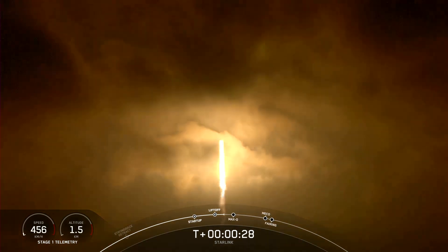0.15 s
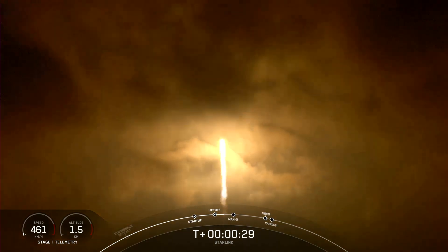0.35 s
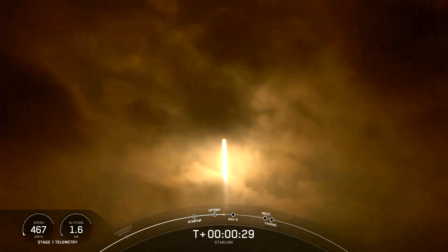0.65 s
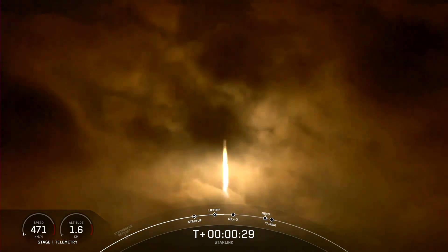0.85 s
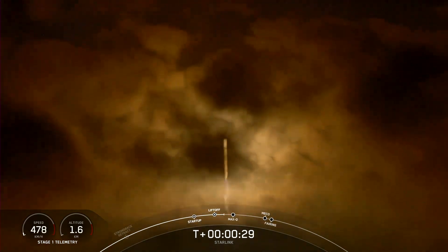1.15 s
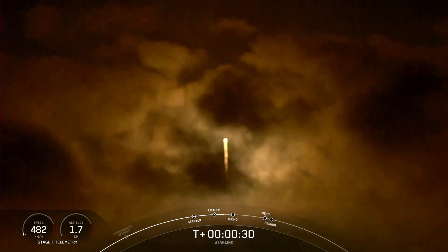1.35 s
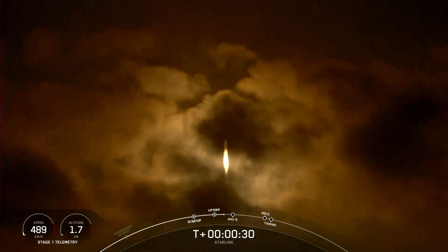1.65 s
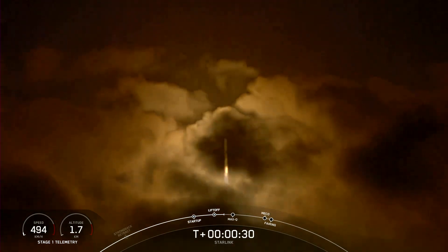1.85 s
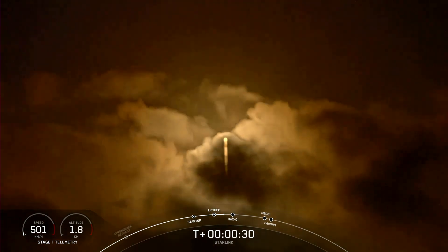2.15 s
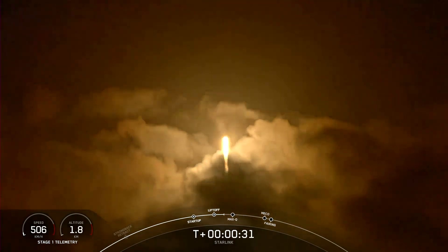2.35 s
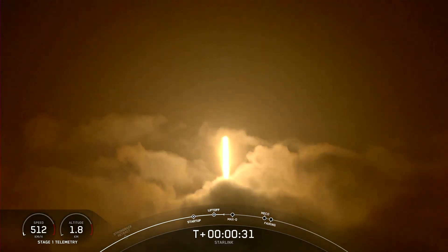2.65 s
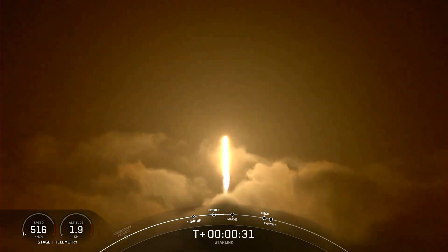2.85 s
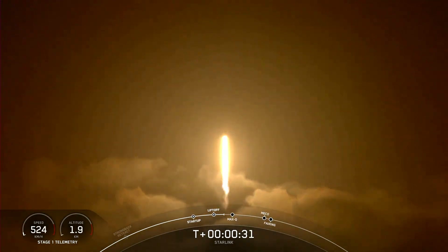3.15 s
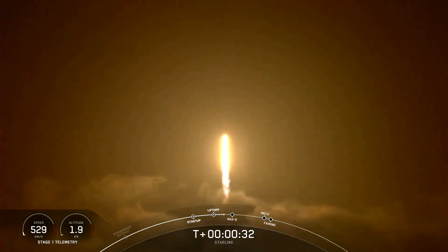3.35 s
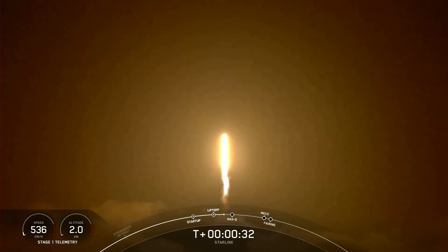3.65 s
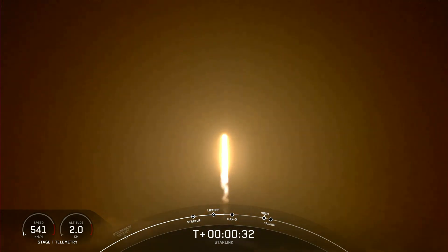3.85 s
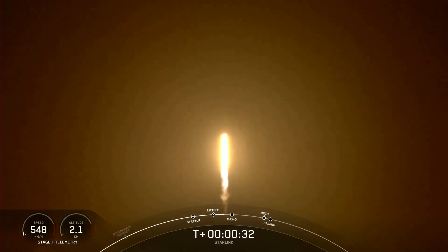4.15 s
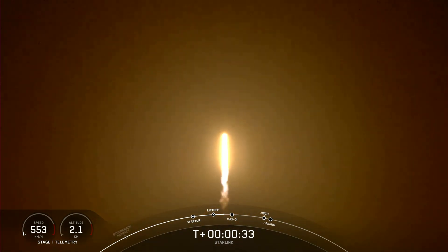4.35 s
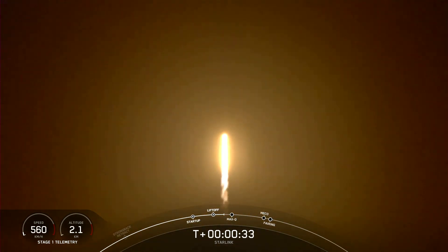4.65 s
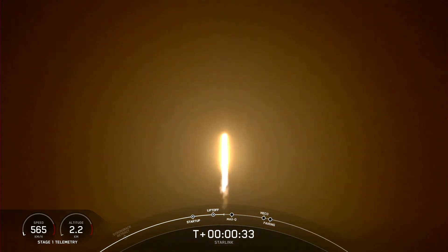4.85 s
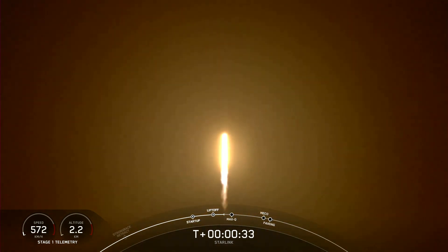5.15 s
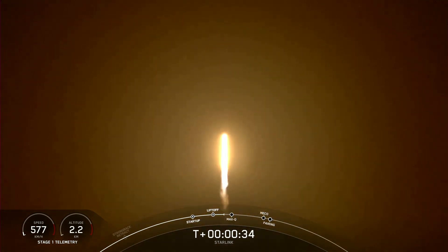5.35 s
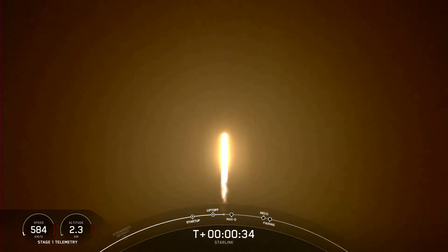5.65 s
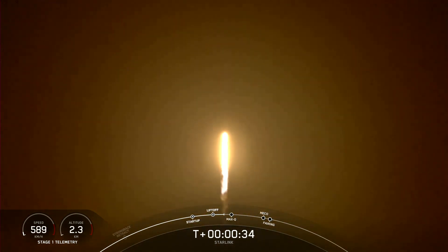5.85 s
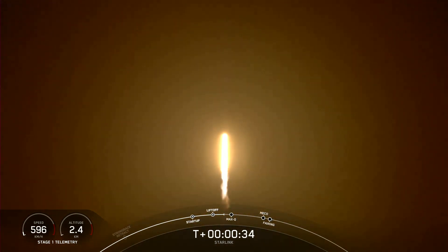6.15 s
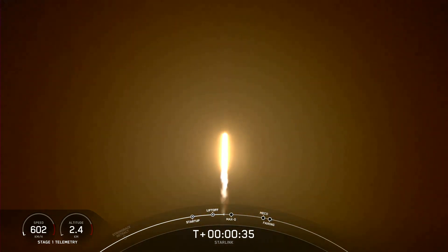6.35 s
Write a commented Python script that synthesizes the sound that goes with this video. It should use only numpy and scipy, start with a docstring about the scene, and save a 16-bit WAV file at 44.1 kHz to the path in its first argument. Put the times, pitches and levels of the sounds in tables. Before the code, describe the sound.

A large rocket ascends through the night sky, heard outdoors from several kilometres away. From 0 to 1.4 seconds the engines are a low, subdued, throbbing rumble, with soft smooth hiss clearly present and a tiny raspy chirp near 0.2. Around 1.5 the bass lifts with a low thump; stronger thumps follow near 2.2 and 2.9, with another small chirp at about 2.2. From 3 seconds the rumble is heavier and a muffled, hollow roar comes forward, with uneven surges around 3.3, 3.6, 4.1 and 4.5. After 5 seconds the roar swells more and faint, distance-dulled crackle emerges; very faint high chirps near 5.5 are almost buried. It is loudest at 6 to 6.5, bass-heavy, the biggest throbs held down, ending mid-roar. A very thin, steady high whine stays far beneath throughout.

```python
"""A large rocket climbs through the night sky a few kilometres from an outdoor microphone.
Its plume is shaped noise: big eddies throb and rumble, small ones roar, and weak shocks, random pulses
dulled by the long air path, crackle. It swells unevenly, with low thumps at the strongest surges.
A delayed, duller ground echo hollows the roar into broad humps. Under it lie a soft hiss of shaped noise
that swells a little, a thin sine whine and a few faint chirps, raspy gliding notes."""
import sys
import numpy as np
from scipy import signal
from scipy.fft import rfft, irfft, next_fast_len
from scipy.io import wavfile
from scipy.ndimage import uniform_filter1d, minimum_filter1d

SR = 44100
rng = np.random.default_rng(int(sys.argv[2]) if len(sys.argv) > 2 else 0)


def to_wav(s):
    """Save 16-bit WAV."""
    ch = np.atleast_2d(s).T  # columns
    pcm = np.round(np.clip(ch, -1, 1) * 32767)  # PCM
    wavfile.write(sys.argv[1], SR, pcm.astype(np.int16))


N = 286209
TIME = np.arange(N) / SR

# relative spectra of the plume layers, before the ground echo: (frequency [Hz], density [dB per Hz])
THROB_SPECTRUM = [(6, -20.5), (20, -6), (33, 1), (46, -1), (64, -8.5)]
RUMBLE_SPECTRUM = [(30, -33), (50, -7.5), (63, -1.5), (78, -2.5), (100, -5.5), (128, -8.5), (160, -12.5),
                   (195, -22.5)]
ROAR_SPECTRUM = [(150, -22.5), (190, -4), (245, -0.5), (310, -5), (400, -9.5), (500, -12), (700, -19),
                 (850, -21.5), (1100, -31), (1500, -38.5), (2500, -46.5)]
# the filter that gives the shock pulses their crackle: (frequency [Hz], gain [dB])
CRACKLE_SPECTRUM = [(300, -17), (700, -3), (1080, 8.5), (1300, 8.5), (1550, -4), (2100, -0.5), (2600, 5.5),
                    (2800, 1), (3100, -14.5), (3600, -29)]
# the plume swells unevenly as the rocket climbs, before each layer's trim:
# (time [s], bass level [dB], roar level [dB])
PLUME_SWELL = [(0, -32.5, -48.0), (0.8, -32.5, -46), (1.5, -29, -45.5), (2.4, -29, -44.5),
               (3.15, -25.5, -41), (4.5, -24, -40.5), (5.25, -22, -37.0), (6.49, -18.5, -35.0)]
# the strongest surges of the plume, each a low thump: (time [s], throb lift [dB], rumble lift [dB])
PLUME_SURGES = [(1.5, 4.5, 4), (2.23, 8, 0), (2.8, 5, 0.5), (2.88, 8, -0.5), (3.27, 5, 2.5),
                (3.57, 8.5, 1.5), (4.08, 3.5, -1.5), (4.51, 8, 3.5), (4.77, 4, 3.5), (5.12, 2, 4.5),
                (5.28, 1, 4.5), (5.42, 6, -1), (5.91, 2, 0), (6.25, 5.5, 0)]
# the ground echo as the rocket climbs: (time [s], lag [ms], strength [0-1])
GROUND_ECHO = [(0, 2.83, 0.4), (6.49, 2.897, 0.65)]
# relative spectrum of the soft hiss: (frequency [Hz], density [dB per Hz])
HISS_SPECTRUM = [(100, 4), (900, 0), (1500, -1.5), (1750, 0), (2150, -4), (2600, -4), (3200, -7),
                 (4000, -11), (5000, -15), (7500, -20), (8500, -23.5), (12700, -31.5)]
# how loud the hiss is: (time [s], level [dB])
HISS_LEVEL = [(0, -62), (2.2, -62.3), (3.3, -61), (4.8, -61.5)]
# faint chirps of small night animals:
# (start [s], length [s], start pitch [Hz], end pitch [Hz], rasp rate [levels per s], level [dB])
NIGHT_CHIRPS = [(.165, .045, 2420, 2350, 550, -65.5), (2.225, .055, 2620, 2620, 600, -63),
                (2.22, .2, 3950, 4400, 400, -79), (3.11, .06, 4750, 4800, 250, -79),
                (5.45, .11, 4700, 4750, 180, -76), (5.62, .1, 4100, 4050, 180, -78)]

SURGE_WIDTH_S = 0.025  # standard deviation of the bell curve
# the bass also heaves at random: new levels per second, and their spread
HEAVE_PER_S, THROB_HEAVE_DB, RUMBLE_HEAVE_DB = 18, 1.68, 0.85
GROUND_DULL_HZ = 870
WHINE_HZ, WHINE_DB = 8000, -92
TOP_HZ = 12750


def undb(db):
    """Decibels to gain."""
    return 10 ** (np.asarray(db) / 20)


def curve(rows, axis=1):
    """One column of (time, value, ..) rows, joined by straight lines."""
    rows = np.array(rows)
    return np.interp(TIME, rows[:, 0], rows[:, axis])


def unit(x):
    """Scale to rms 1."""
    return x / np.std(x)


def colour(x, points):
    """Shape a sound by (Hz, dB) points on a log-frequency axis, falling steeply above the last; rms 1."""
    hz, db = np.transpose(points)
    size = next_fast_len(N)
    bins = np.maximum(np.fft.rfftfreq(size, 1 / SR), 1)
    shape = undb(np.interp(np.log(bins), np.log(hz), db))
    steep_fall = np.minimum(hz[-1] / bins, 1) ** 6
    return unit(irfft(rfft(x, size) * shape * steep_fall, size)[:N])


def walk(rate):
    """Random levels held 1 / rate s, then smoothed twice into slopes; spread 1."""
    hold = max(int(SR / rate), 2)
    steps = np.repeat(rng.standard_normal(N // hold + 1), hold)
    slopes = uniform_filter1d(uniform_filter1d(steps, hold), hold)
    return unit(slopes[:N])


def surges(axis):
    """Lift in dB from one column of the surges; each rises and falls like a bell curve."""
    lift_db = 0
    for row in PLUME_SURGES:
        lift_db = lift_db + row[axis] * np.exp(-0.5 * ((TIME - row[0]) / SURGE_WIDTH_S) ** 2)
    return lift_db


def eddies(points, even_s):
    """Turbulent pressure: rough from moment to moment, of even power over longer stretches."""
    x = colour(rng.standard_normal(N), points)
    span = max(int(even_s * SR), 2)
    power = uniform_filter1d(uniform_filter1d(x ** 2, span), span)
    return x / np.sqrt(power)


def shocks(per_s, scatter_db):
    """Pressure jumps at random moments, many weak and a few strong."""
    arrives = rng.random(N) < per_s / SR
    return arrives * undb(scatter_db * np.clip(rng.standard_normal(N), -2, 2))


def plume(throb_db=-8, rumble_db=-5.0, roar_db=-0.74, roar_flutter_db=0.5,
          crackle_db=-64, crackle_growth=1.9, full_db=-37):
    """Eddies of three sizes and shocks; these steepen with loudness, so crackle outgrows roar."""
    bass_db = curve(PLUME_SWELL, axis=1)
    strength_db = curve(PLUME_SWELL, axis=2) + roar_flutter_db * walk(HEAVE_PER_S)
    throb_lift_db = surges(axis=1) + THROB_HEAVE_DB * walk(HEAVE_PER_S)
    rumble_lift_db = surges(axis=2) + RUMBLE_HEAVE_DB * walk(HEAVE_PER_S)
    throb = eddies(THROB_SPECTRUM, even_s=0.05) * undb(bass_db + throb_lift_db + throb_db)
    rumble = eddies(RUMBLE_SPECTRUM, even_s=0.066) * undb(bass_db + rumble_lift_db + rumble_db)
    roar = eddies(ROAR_SPECTRUM, even_s=0.1) * undb(strength_db + roar_db)
    # crackle_db is reached where the plume strength equals full_db
    crackle_level_db = crackle_db + crackle_growth * (strength_db - full_db)
    crackle = colour(shocks(per_s=1200, scatter_db=2.5), CRACKLE_SPECTRUM) * undb(crackle_level_db)
    return throb + rumble + roar + crackle


def over_ground(x):
    """The sound arrives directly and again off the ground, whose roughness scatters the treble."""
    size = next_fast_len(N + SR)
    bins = np.fft.rfftfreq(size, 1 / SR)
    dulling = np.sqrt(1 + (bins / GROUND_DULL_HZ) ** 2)
    bounce = irfft(rfft(x, size) / dulling, size)[:N]
    lag_s = curve(GROUND_ECHO) / 1000
    echo = np.interp(TIME - lag_s, TIME, bounce)
    return x + curve(GROUND_ECHO, axis=2) * echo


def background():
    """Smooth hiss that swells a little, and a thin electronic whine."""
    hiss = undb(curve(HISS_LEVEL)) * colour(rng.standard_normal(N), HISS_SPECTRUM)
    whine = undb(WHINE_DB) * np.sqrt(2) * np.sin(2 * np.pi * WHINE_HZ * TIME)
    return hiss + whine


def chirps():
    """Each chirp is a raspy gliding note that swells and fades."""
    out = np.zeros(N)
    for start, length, from_hz, to_hz, rasp_rate, db in NIGHT_CHIRPS:
        progress = np.clip((TIME - start) / length, 0, 1)
        pitch_hz = from_hz + (to_hz - from_hz) * progress
        phase = 2 * np.pi * np.cumsum(pitch_hz) / SR
        # random swings of both quadratures roughen the note
        raspy_note = walk(rasp_rate) * np.cos(phase) + walk(rasp_rate) * np.sin(phase)
        out += undb(db) * np.sin(np.pi * progress) * raspy_note
    return out


def limiter(x, ceiling_db=-12.1, hold_s=0.008):
    """The gain dips smoothly around every peak that would pass the ceiling."""
    span = max(int(hold_s * SR), 2)
    allowed = undb(ceiling_db) / np.maximum(np.abs(x), undb(ceiling_db))
    held = minimum_filter1d(allowed, 2 * span)
    return x * uniform_filter1d(uniform_filter1d(held, span), span)


def scene():
    """The rocket over open ground and the quiet night around the microphone."""
    rocket = over_ground(plume())
    return (rocket + background() + chirps())[None]


def record(dry):
    """The recorder holds down the largest throbs, then cuts steeply above the top frequency."""
    top_cut = signal.ellip(10, 0.2, 80, TOP_HZ, fs=SR, output="sos")
    return signal.sosfilt(top_cut, limiter(dry))


dry = scene()
out = record(dry)
to_wav(out)
```